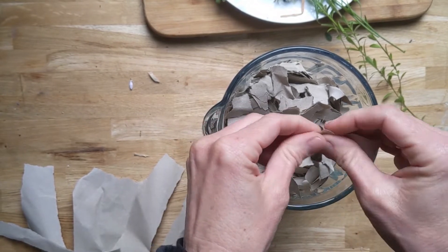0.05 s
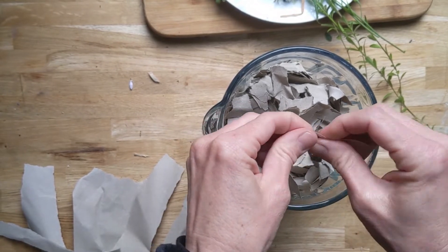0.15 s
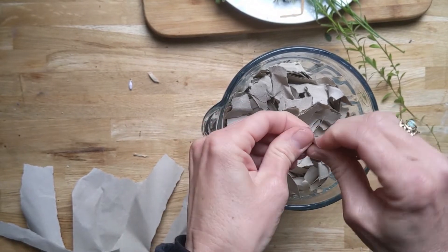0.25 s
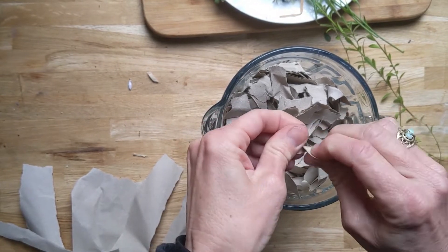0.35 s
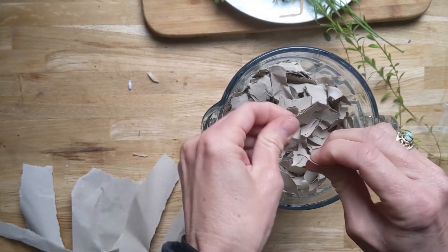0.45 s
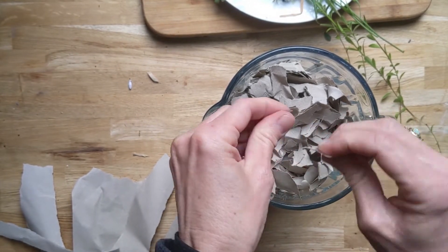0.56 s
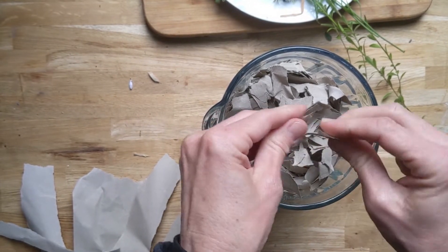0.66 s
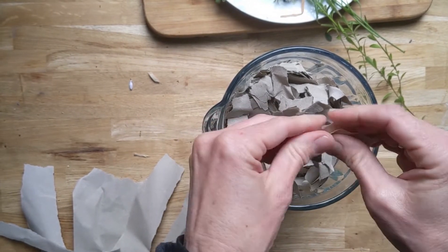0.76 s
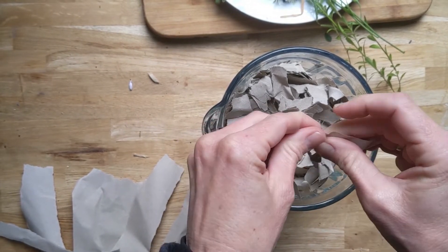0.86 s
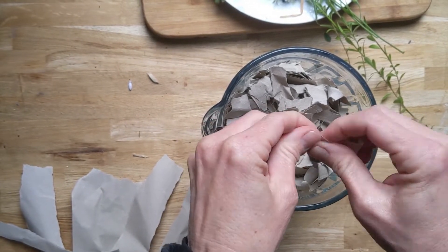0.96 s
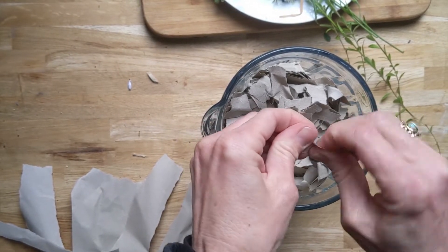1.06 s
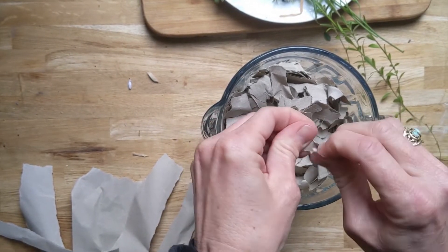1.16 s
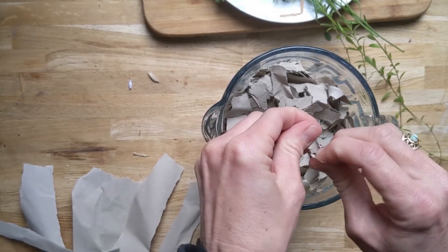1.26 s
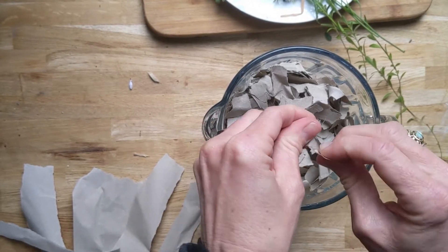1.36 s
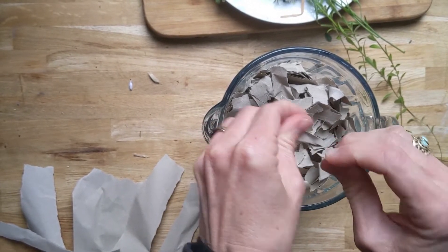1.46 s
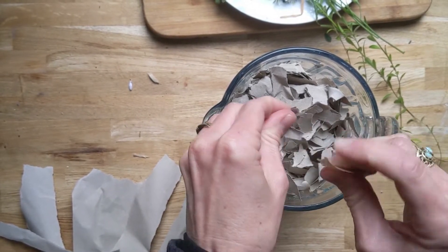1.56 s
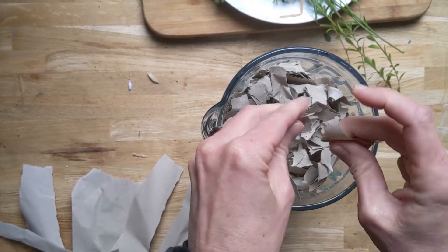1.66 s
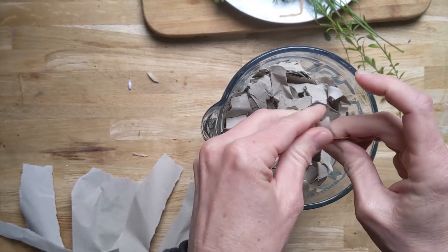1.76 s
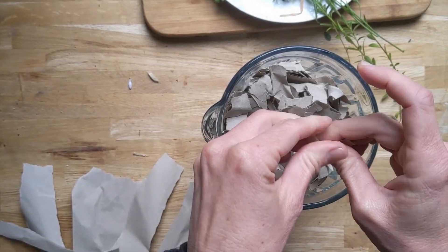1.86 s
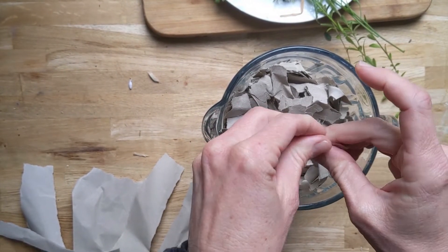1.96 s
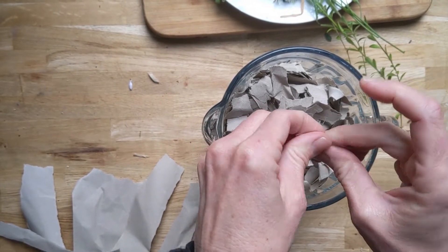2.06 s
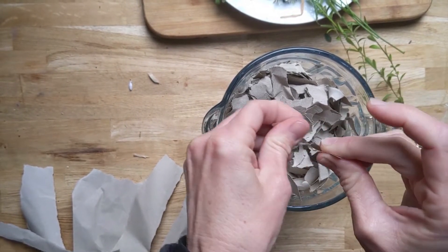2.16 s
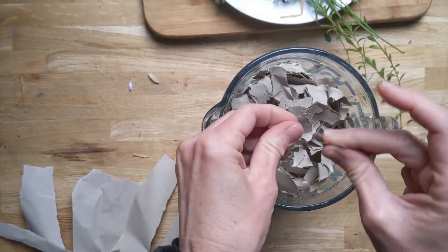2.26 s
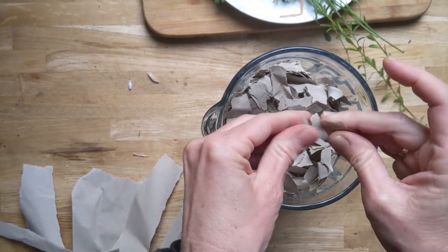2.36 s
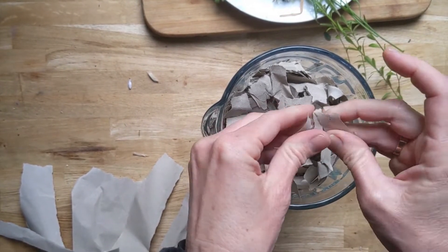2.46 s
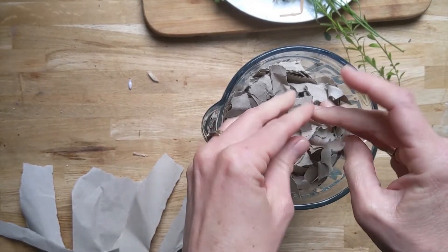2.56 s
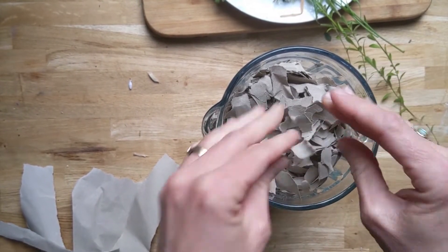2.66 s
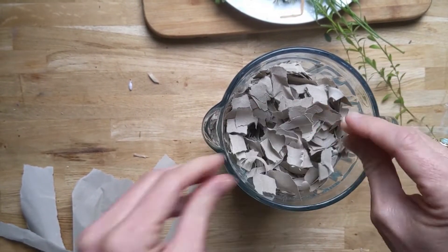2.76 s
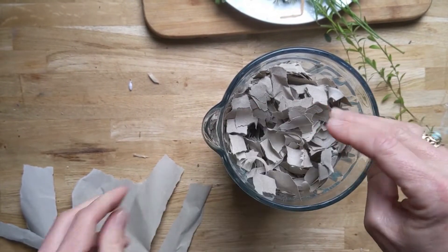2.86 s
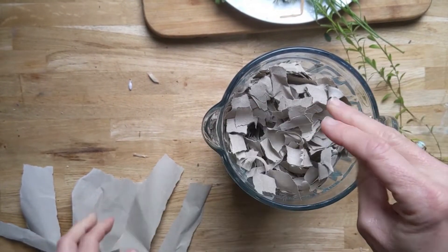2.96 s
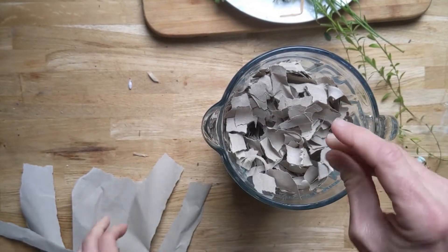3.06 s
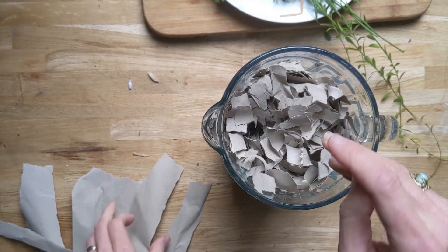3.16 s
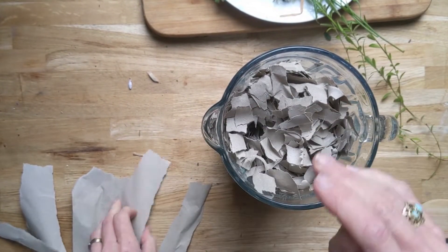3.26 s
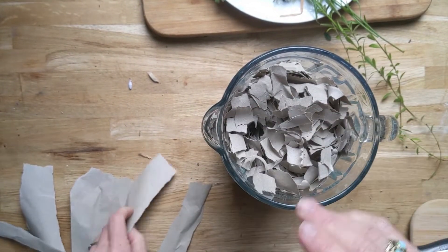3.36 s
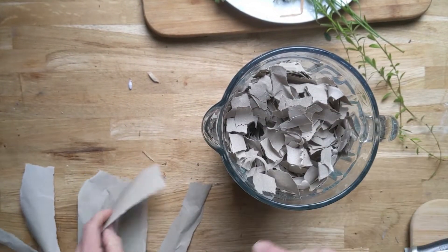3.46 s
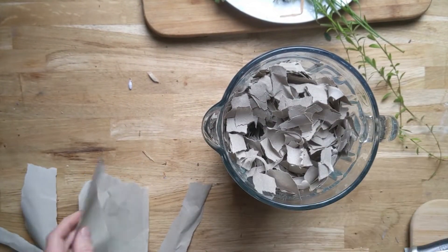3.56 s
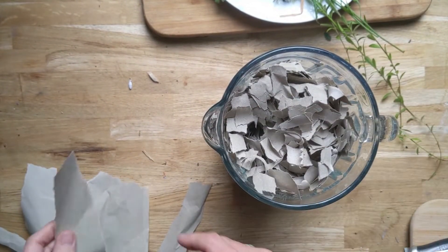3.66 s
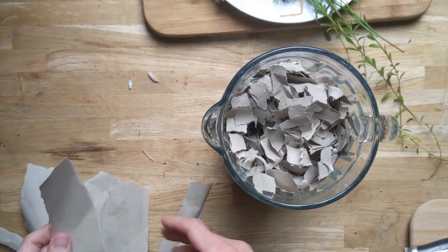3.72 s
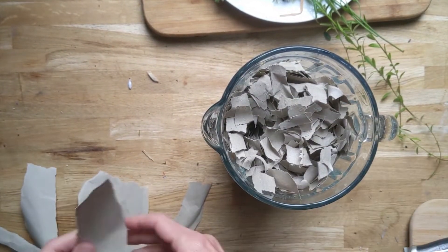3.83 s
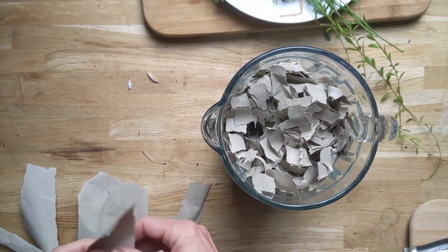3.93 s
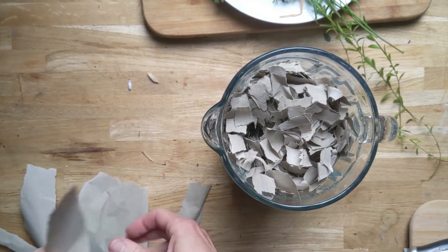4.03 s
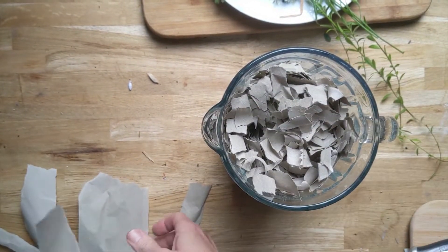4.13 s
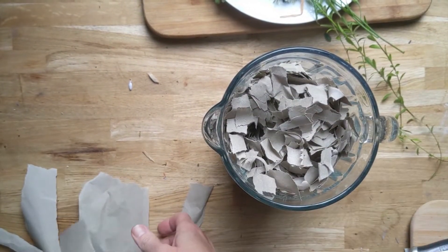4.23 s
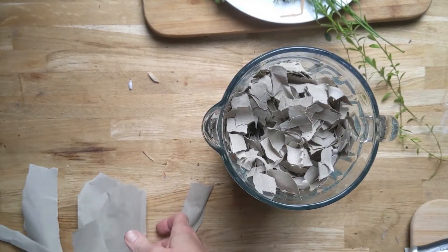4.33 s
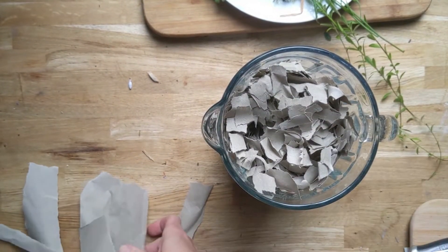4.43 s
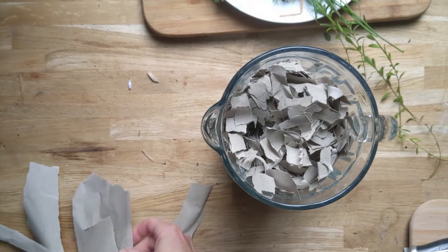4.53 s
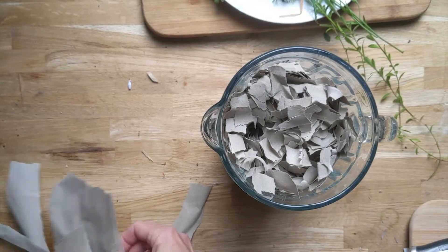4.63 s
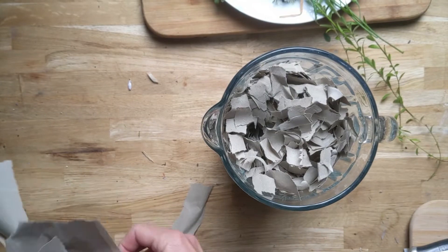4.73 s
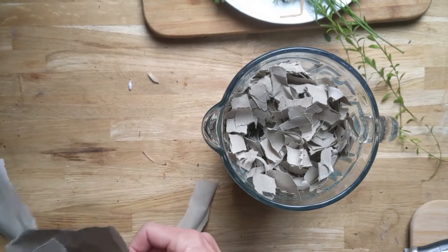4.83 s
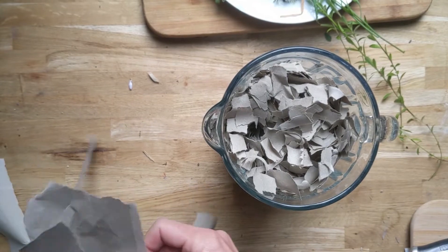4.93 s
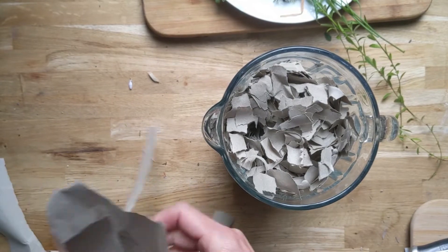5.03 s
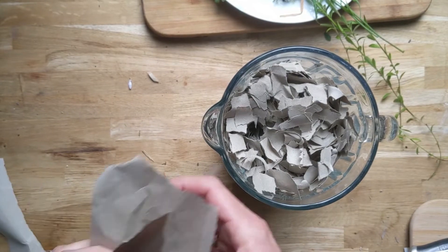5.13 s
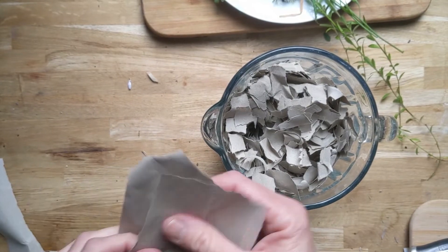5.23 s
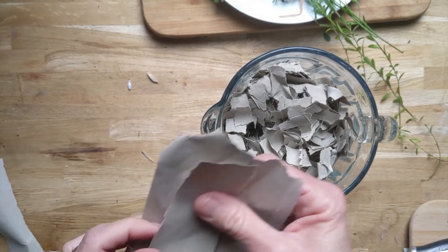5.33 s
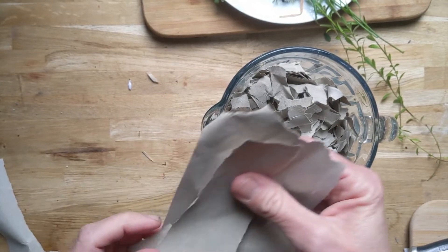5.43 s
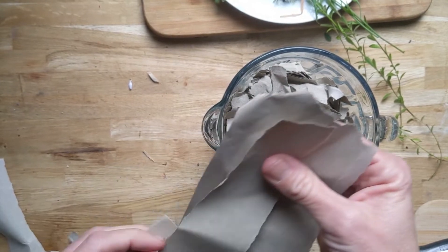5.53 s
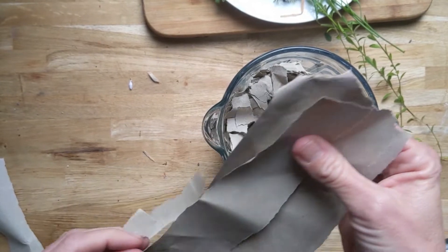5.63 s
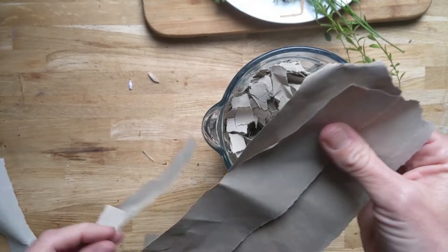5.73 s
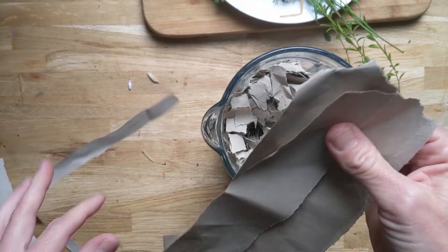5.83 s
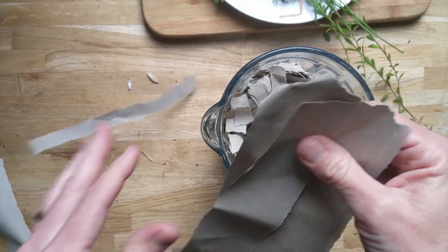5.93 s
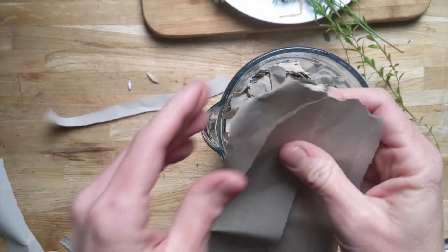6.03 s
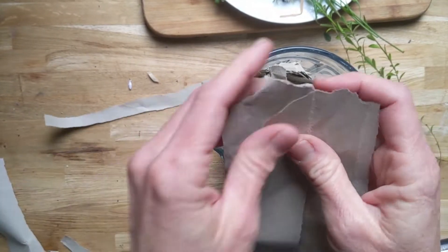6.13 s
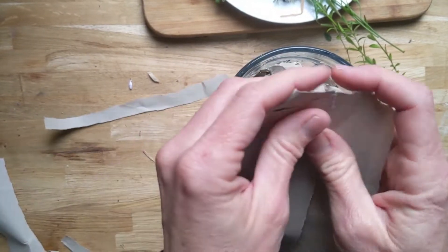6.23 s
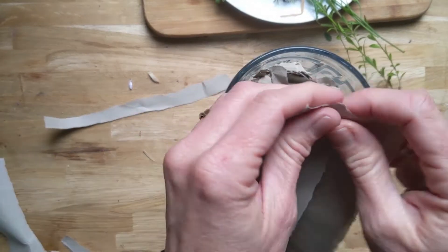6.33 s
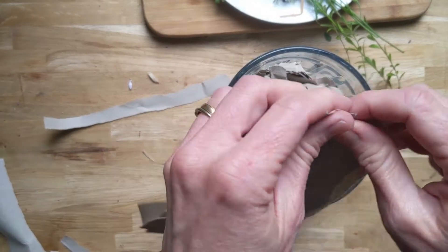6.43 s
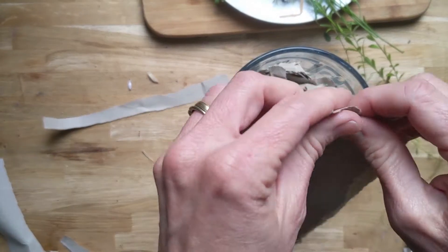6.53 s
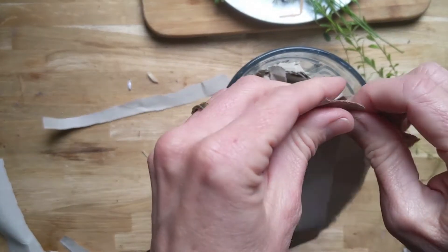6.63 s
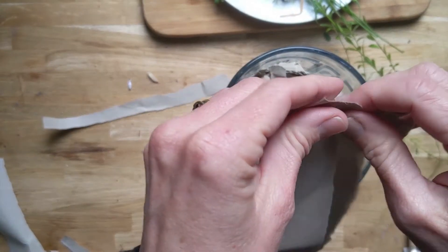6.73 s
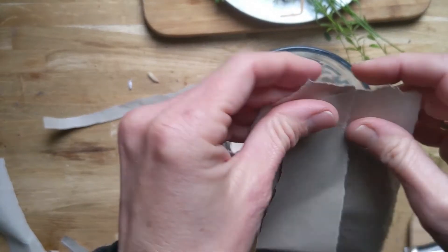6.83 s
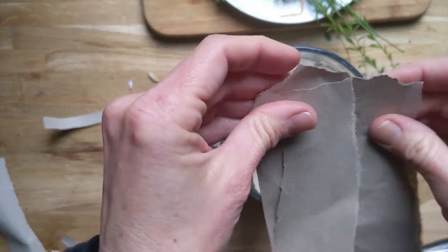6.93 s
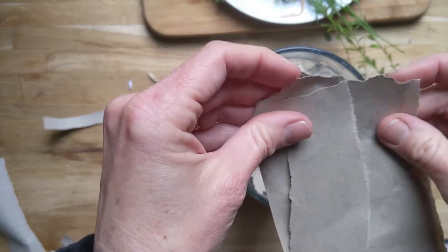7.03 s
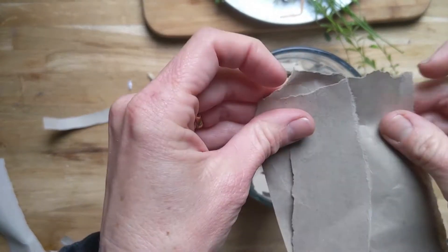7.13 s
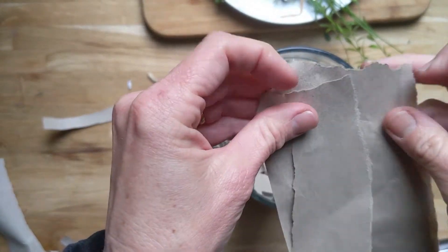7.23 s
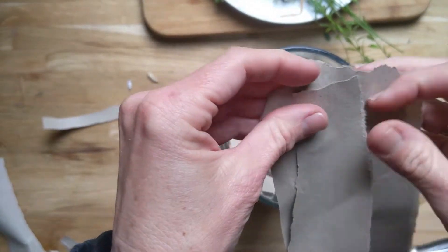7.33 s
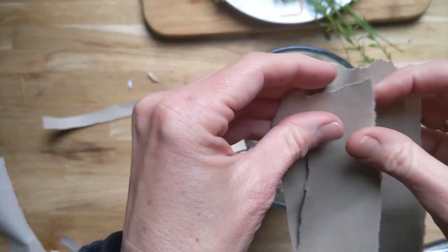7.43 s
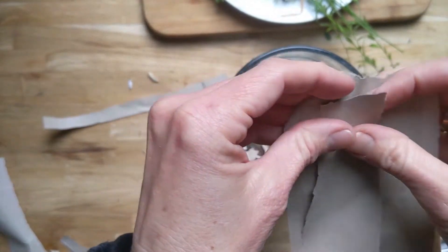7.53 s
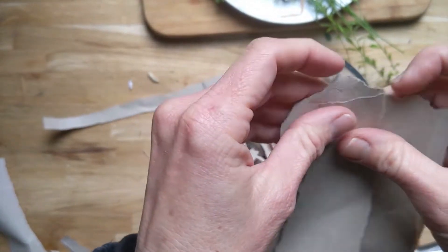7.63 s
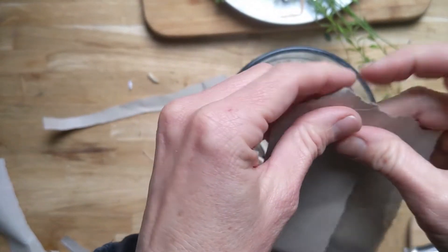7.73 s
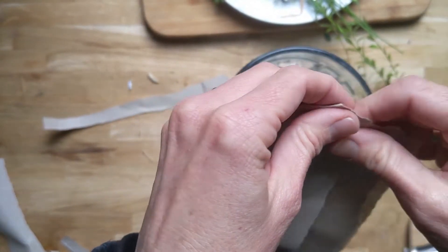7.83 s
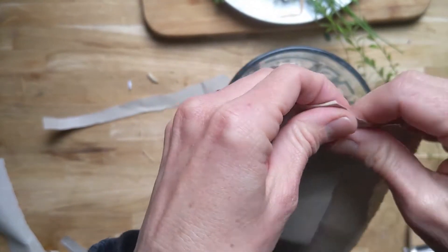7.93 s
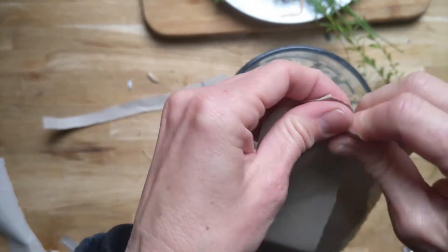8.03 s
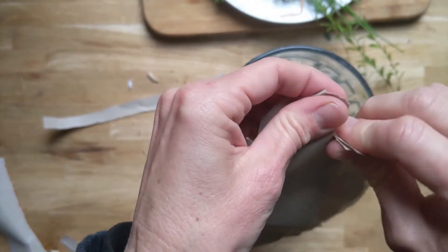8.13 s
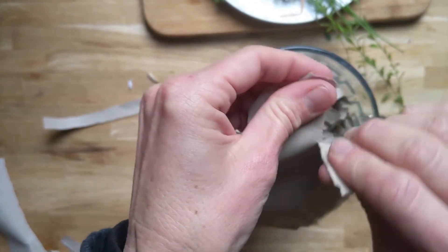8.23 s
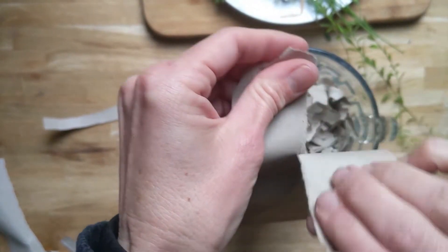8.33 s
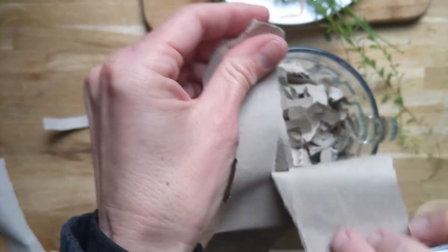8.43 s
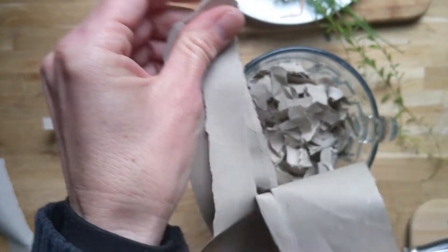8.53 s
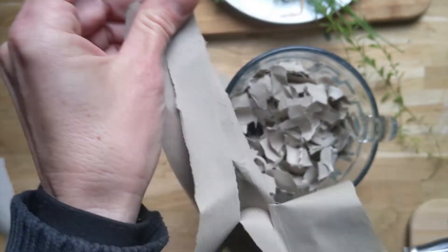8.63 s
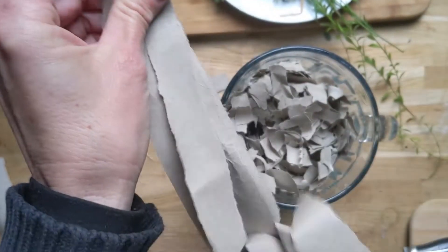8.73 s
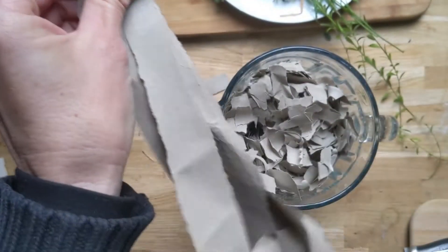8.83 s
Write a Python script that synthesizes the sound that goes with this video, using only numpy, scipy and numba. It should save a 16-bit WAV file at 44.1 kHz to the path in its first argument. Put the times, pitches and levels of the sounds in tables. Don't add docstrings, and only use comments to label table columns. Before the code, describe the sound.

Hands tear small paper scraps with tiny crisp rips, then drag, flap and crumple larger sheets, ending in a loud long tear in a quiet room.

```python
import sys
import numpy as np
from scipy import signal
from scipy.fft import rfft, irfft
from scipy.io import wavfile
from scipy.ndimage import uniform_filter1d
from numba import njit

SR = 44100
rng = np.random.default_rng(int(sys.argv[2]) if len(sys.argv) > 2 else 0)


def put_to_file(sound):
    columns = np.atleast_2d(sound).T
    safe = np.clip(columns, -1, 1)
    whole_steps = np.round(safe * 32767)
    wavfile.write(sys.argv[1], SR, whole_steps.astype(np.int16))


def invert_db(x):
    u = np.asarray(x, float) / 20
    return 10 ** u


N = 391608
SCRAPS_END_S = 3.4

# (f/Hz, left-right correlation)
LIKENESS = [(60, 0.97), (300, 1), (700, 0.36), (1400, 0.44), (3100, 0.38), (6500, 0.0069)]
# (t/s, pull as level/dB, flap re level/dB, edge brightness/dB)
TEAR = [(8.14, -63, -25, 13.5), (8.223, -38.5, -12, 4.5), (8.294, -33.5, -16.5, -1.5),
        (8.336, -38, -4.5, 4.5), (8.39, -33, -17, 6), (8.422, -28, -26, 2.5), (8.45, -29.5, -11.5, 1),
        (8.492, -29.5, -13.5, 8.5), (8.52, -29, -13.5, 3.5), (8.562, -31.5, -10, 5), (8.598, -27, -17, 1.5),
        (8.625, -24.5, -14.5, -2), (8.66, -28, -15, 1), (8.704, -34, -5, 3.5), (8.764, -26.5, -14.5, -1),
        (8.785, -27.5, -11, -1), (8.84, -28.5, -12, 1.5), (8.88, -29, -17, 2)]


def on_log(table, hz):
    f, v = np.transpose(table)
    return np.interp(np.log(hz), np.log(f), v)


def unit(x):
    return x / np.sqrt(np.mean(x ** 2) + 1e-30)


@njit
def svf(x, hz, width):
    y, b, l = np.empty(len(x)), 0., 0.
    g, k = np.tan(np.pi * hz / SR), width / hz
    for i in range(len(x)):
        v = (b + g * (x[i] - l)) / (1 + g * (g + k))
        b, l, y[i] = 2 * v - b, l + 2 * g * v, k * v
    return y


def band(x, hz, width):
    hz, width = float(hz), float(width)
    return np.array([svf(svf(c + 1e-18, hz, width), hz, width) for c in x])


def pair(size, like):
    mid, side = rng.standard_normal((2, size))
    like = np.clip(like, 0, .99)
    return np.sqrt((1 + like) / 2) * mid + np.sqrt((1 - like) / 2) * side * np.array([[1], [-1]])


def walk(rate):
    k = int(SR / rate)
    held = np.repeat(rng.standard_normal(N // 50)[:N // k + 1], k)
    return unit(uniform_filter1d(uniform_filter1d(held, k), k)[:N])


@njit
def grains(starts, poles, sizes, size):
    out = np.zeros((2, size))
    for k in range(len(starts)):
        z = 1. + 0j
        for i in range(starts[k], size):
            z *= poles[k]
            out[0, i] += sizes[k, 0] * z.imag
            out[1, i] += sizes[k, 1] * z.imag
            if z.real ** 2 + z.imag ** 2 < 1e-5:
                break
    return out


def room_tone(t):
    # (f/Hz, level per Hz/dB)
    air_colour = [(20, -10), (45, -7), (80, -11), (124, -8), (212, -17.5), (340, -15), (500, -18),
                  (1000, -25), (2500, -30), (7300, -39.5), (11000, -29), (15000, -32.5)]
    # (f/Hz, left-right correlation)
    air_likeness = [(60, 0.86), (130, 0.84), (290, 0.69), (640, 0.047), (1400, 0.0065)]
    # (f/Hz, rms level/dB)
    hums = [(24.2, -85), (45.45, -66), (56.8, -70.5), (113.6, -71.5), (134.8, -77), (170.4, -82),
            (336, -80.5), (342, -76.5)]
    hz = np.fft.rfftfreq(N, 1 / SR) + 1
    mid, side = rfft(rng.standard_normal((2, N)))
    like = on_log(air_likeness, hz)
    both = np.sqrt(1 + like) * mid + np.sqrt(1 - like) * side * np.array([[1], [-1]])
    air = invert_db(-64) * unit(irfft(both * invert_db(on_log(air_colour, hz)), N))
    return air + sum(invert_db(db + 1.5) * np.sin(2 * np.pi * (f * t + rng.random())) for f, db in hums)


def squeak(t):
    # start t/s, end t/s, f/Hz, level/dB
    skid = (2.662, 2.698, 2690, -78)
    start, end, hz, db = skid
    phase = 2 * np.pi * hz * np.cumsum(1 + 0.0034 * walk(rate=300)) / SR
    stack = 1.2 * np.sin(phase) + np.sin(2 * phase) + 1.1 * np.sin(3 * phase)
    return invert_db(db) * stack * np.clip(np.minimum(t - start, end - t) / .005, 0, 1)


def bumps():
    # (t/s, peak level/dB, f/Hz)
    pushes = [(4.237, -47, 300), (4.25, -59, 606), (4.378, -59, 580), (5.28, -42, 330), (5.464, -40, 205),
              (6.289, -56, 575), (6.857, -55, 168), (7.079, -49, 243), (7.189, -42.5, 275),
              (7.285, -43.5, 177), (7.376, -40, 191), (7.41, -49, 175), (7.655, -56, 150)]
    out, t = np.zeros((2, N + SR)), np.arange(SR // 8) / SR
    for s, peak_db, hz in pushes:
        width = hz if hz < 400 else 0.2 * hz
        push = band(pair(len(t), 0.99) * np.exp(-t / 0.008), hz, width)
        at = int(s * SR)
        out[:, at:at + len(t)] += invert_db(peak_db + 2) * push / np.abs(push).max()
    return out[:, :N]


def snaps():
    # (t/s, peak level/dB, ring f/Hz, tick level re peak/dB, ring level re crack/dB)
    lift_creases = [(3.293, -37, 2790, -38, 7), (3.356, -37, 2250, -30, -4), (3.563, -39.5, 970, -27, -2),
                    (3.911, -45, 790, -25, -10), (4.02, -19, 1630, -42, -5.5), (4.0201, -35, 775, -40, -1),
                    (4.067, -31, 1700, -31, -5), (4.0809, -20.5, 2530, -21, -23),
                    (4.202, -34.5, 1530, -25, -13), (4.207, -37, 625, -26, -12), (4.344, -40, 2230, -22, 1),
                    (4.759, -33.5, 1240, -30, -6), (4.884, -27.5, 705, -57, -9),
                    (4.8835, -21, 2780, -28, -9), (4.938, -46, 360, -24, -10), (4.995, -44, 5200, -24, 0),
                    (5.036, -36, 2200, -25, 4), (5.103, -44, 1250, -25, -12), (5.196, -51, 580, -25, 0),
                    (5.457, -44, 620, -30, 9), (5.259, -26, 2020, -37, -25), (5.2726, -16, 3060, -21, -13),
                    (5.388, -30, 970, -38, -0.5), (5.464, -23, 794, -39, 2), (5.4646, -17, 3330, -35, -6),
                    (5.263, -28, 3250, -30, -6)]
    fold_creases = [(5.969, -51, 1230, -27, -2), (6.006, -44.5, 313, -15.5, -3.5),
                    (6.251, -34, 3400, -30.5, -18), (6.294, -38.5, 740, -22, -2),
                    (6.468, -45, 1230, -15, -1), (6.53, -26.5, 1226, -20, -5), (6.603, -39, 890, -16, -10),
                    (6.758, -54, 3000, -20, -4), (6.85, -14.5, 3000, -7, -2), (6.8505, -31, 755, -30, 0),
                    (6.851, -31.5, 1150, -30, -1), (6.898, -26.5, 2460, -29, -1),
                    (6.958, -61, 1210, -33, -11), (6.979, -46, 5530, 7, -6), (7.018, -46, 1770, -30, 5),
                    (7.037, -49, 1770, -12, 6), (7.105, -30, 2550, -25, -1),
                    (7.108, -27.5, 1240, -38.5, 2.5), (7.258, -38, 2430, -16, -9),
                    (7.286, -29.5, 2570, -42, -2), (7.374, -22.5, 1880, -42, -31),
                    (7.556, -41, 1230, -19, 1), (7.584, -23, 1230, -49, -2.5), (7.63, -37.5, 1820, -30, -9),
                    (7.65, -39.5, 750, -30, -10), (7.71, -51, 1250, -30, 6), (7.8106, -31, 1164, -40, 6),
                    (7.9288, -18, 2870, -35, -6), (7.9288, -23, 1220, -40, -6)]
    tear_layers = [
        (8.178, -39, 1330, -5, 13),
        (8.197, -38, 1260, -3, -3),
        (8.412, -18.5, 1820, -20, -4),
        (8.496, -18, 3800, -20, 9),
        (8.517, -15, 3810, -26, 4),
        (8.618, -23, 2440, -25, -10),
        (8.77, -14, 2890, -29, -5),
    ]
    # free, pinched, tearing sheet [ms]
    tail_times_ms = (56, 59, 79)
    # (ratio to ring f, level/dB)
    panel_overtones = [(2.15, -3), (4.2, -6)]
    out, t = np.zeros((2, N + SR)), np.arange(SR // 16) / SR
    kick = 5 * (t == 0)
    sheets = zip((lift_creases, fold_creases, tear_layers), tail_times_ms)
    events = [(*row, t60_ms / 1000) for rows, t60_ms in sheets for row in rows]
    for s, peak_db, hz, tick_db, ring_db, t60 in events:
        lags = np.append(0, rng.random(3)) * 0.0035
        crack = sum(invert_db(-4500 * lag) * (t >= lag) * np.exp(-np.abs(t - lag) / 0.00048) for lag in lags)
        decay = np.exp(-np.log(1000) * t / t60)

        body_hz = np.sqrt(hz * 1800)
        body = unit(band(pair(len(t), .65) * (crack + .45 * decay) + kick, body_hz, 1.7 * body_hz))
        struck = band(pair(len(t), on_log(LIKENESS, hz)) * crack + kick, hz, hz)
        ring = unit(np.array([svf(c, float(hz), hz / 9) for c in struck]))
        for ratio, db in panel_overtones:
            overtone = band(pair(len(t), 0.1) * crack, min(ratio * hz, 6000), 25 / t60)
            body = body + 0.2 * invert_db(db) * unit(overtone)
        thump = band(pair(len(t), .9) * np.exp(-t / .007), 340, 600)
        tick = band(pair(len(t), 0) * (crack + 0.035 * decay), 11800, 17000)

        thump_db = -42 - 0.51 * peak_db
        sound = body + invert_db(ring_db) * ring
        sound = sound / np.abs(sound).max()
        sound = sound + invert_db(thump_db + 8) * thump / np.abs(thump).max()
        sound = sound + invert_db(tick_db + 10) * tick / np.abs(tick).max()
        at = int((s + .001) * SR)
        out[:, at:at + len(t)] += invert_db(peak_db) * sound
    return out[:, :N]


def spikes():
    # (t/s, peak level/dB, f/Hz)
    scrap_fibres = [(0.2976, -31, 10900), (0.3534, -32, 10400), (0.3625, -29, 10500), (0.3846, -35, 14200),
                    (0.4263, -38, 12100), (0.4282, -40, 12200), (0.4329, -32, 12300), (0.4372, -26, 12100),
                    (0.4396, -30, 11900), (0.4423, -34, 12500), (0.448, -19, 12000), (0.448, -23, 12100),
                    (0.4511, -32, 14500), (0.4545, -36, 12000), (0.7445, -27.5, 10000),
                    (1.0242, -24, 12000), (1.0256, -37, 10200), (1.0363, -35, 13800), (1.0389, -24, 14500),
                    (1.0422, -35, 14500), (1.0509, -25.5, 13600), (1.1678, -24, 13400), (1.169, -24, 11900),
                    (1.173, -18, 14400), (1.1754, -18, 13400), (1.1775, -13, 12670), (1.1794, -20, 12200),
                    (1.183, -14.5, 13600), (1.1844, -33, 12000), (1.1868, -30, 14500), (1.1889, -32, 13800),
                    (1.1916, -35, 13700), (1.4324, -31, 13300), (1.4366, -38, 11600), (1.4391, -29, 12100),
                    (1.4407, -25, 12000), (1.4435, -24, 13300), (1.4458, -32, 13900), (1.4514, -24, 11700),
                    (1.4548, -13, 13900), (1.4552, -25, 14300), (1.4573, -13, 11800), (1.46, -22, 10900),
                    (2.1196, -32, 15400), (2.1215, -28, 12900)]
    # (t/s, peak level/dB, f/Hz)
    tear_fibres = [(8.4135, -18, 12800), (8.4178, -11, 4100), (8.4519, -12, 14400), (8.4621, -13, 3300),
                   (8.4644, -5.5, 2500), (8.4704, -17, 14900), (8.4862, -18, 3700), (8.4925, -14, 10800),
                   (8.4949, -14, 10000), (8.499, -16, 10400), (8.5015, -15, 12100), (8.5044, -11, 3600),
                   (8.509, -9, 10300), (8.517, -7, 3800), (8.5337, -14, 3700), (8.5883, -14, 5400),
                   (8.6012, -11, 3400), (8.6181, -17, 3400), (8.6204, -16, 11800), (8.6395, -12, 2900),
                   (8.6623, -14, 12700), (8.6676, -17, 11400), (8.7713, -12, 4720), (8.773, -3.5, 3130),
                   (8.778, -9, 2800), (8.7817, -12, 3100), (8.791, -20, 3600), (8.8072, -13, 12600),
                   (8.8397, -14, 11300), (8.848, -6, 5800)]
    s, db, hz = np.transpose([*scrap_fibres, *tear_fibres])
    poles = np.exp((2j * np.pi * hz - 1 / .0002) / SR)
    side = .6 * (2 * rng.random((len(s), 1)) - 1)
    sizes = invert_db(db - 2)[:, None] * (1 + side * [1, -1])
    pops = grains((s * SR).astype(np.int64), poles, sizes, size=N)
    return signal.sosfilt(signal.butter(3, 2000, "high", fs=SR, output="sos"), pops)


def breaks(rate, length_s, spread):
    when, chance = rng.random((int(rate * N / SR), 2)).T
    size = 1 + spread * (np.minimum(-np.log(1 - chance), 2.8) - 1)
    fade = np.exp(-1 / (length_s * SR))
    return signal.lfilter([1], [1, -fade], np.bincount((when * N).astype(int), size, N))


def paper(levels_db, grit_db, rate, spread, bed, flicker_db, size, count):
    # flap, body, fibre [Hz]
    motion_hz = (600, 3000, 11000)
    # (f/Hz, level per third octave/dB)
    sheet_colour = [(75, -27), (150, -18), (300, -14.5), (700, -16), (1200, -12), (2400, -7.5),
                    (3600, -6.5), (5500, -7), (7400, -16), (9700, -5), (12500, -2), (15000, -5.5)]
    # (t/s, change in crispness/dB)
    crispness = [(4.1, 1.5), (4.5, -3.5), (5.0, 3.5), (5.5, 1.5), (6.0, 0.5)]
    out, shared, patch = 0, breaks(rate, 0.000068, spread), walk(rate=13)
    place = np.log(motion_hz)
    crisp_db = np.interp(np.arange(N) / SR, *np.transpose(crispness))
    for hz in 15000 / 2 ** (np.arange(count) / 3):
        weights = [np.interp(np.log(hz), place, row) for row in np.eye(3)]
        patch = 0.61 * patch + 1.17 * walk(rate=60)
        db = np.dot(weights, levels_db) + on_log(sheet_colour, hz) + flicker_db * patch
        db = db + crisp_db * np.exp(-2 * np.log2(hz / 4730) ** 2)
        own = breaks(rate, 2.2 / hz, spread)
        gate = bed + invert_db(grit_db * (0.45 * shared + 0.4 * own)) - 1
        gate = gate / np.sqrt(np.abs(uniform_filter1d(gate ** 2, size=size)))
        hiss = pair(N, on_log(LIKENESS, hz))
        out = out + invert_db(db) * band(gate * hiss, hz, hz * .45) * np.sqrt(SR / (hz * .8))
    return out


def rips(t):
    # (t/s, level/dB, edge brightness/dB)
    quick = [(0.07, -61, 12.5), (0.115, -62, 13), (0.258, -44, 1), (0.292, -60, 22.5), (0.351, -72, 30),
             (0.381, -67, 5), (0.445, -41, 7), (0.742, -46, -3), (0.9, -45, -30), (0.932, -66, -5),
             (1.022, -48, -1), (1.036, -48.5, 11), (1.1, -54.5, 11), (1.314, -72.5, 19),
             (1.452, -39.5, 5.5), (2.006, -53, -15), (2.023, -49, -10), (2.118, -48, 9.5),
             (2.151, -62.5, 22.5), (2.7, -61.5, 2), (3.576, -57, 16), (4.422, -37.5, 14.5), (4.445, -40, 9),
             (5.904, -66.5, 18), (2.35, -68, 7), (8.109, -55, 13), (8.124, -56.5, 17), (1.008, -70, 16),
             (1.144, -74, 17), (1.239, -69, 17.5), (1.42, -66, 17), (2.45, -67, 0), (3.015, -80, 17),
             (.218, -62.5, 2.5), (.66, -70, 9)]
    # (t/s, level/dB, edge brightness/dB, rise/ms)
    slow = [
        (0.424, -66.5, 35, 20),
        (1.166, -52.5, 19, 15),
        (1.432, -53, 18, 8.8),
        (8.04, -39, 4.5, 3.2),
    ]
    quick_rise_ms, fall_ms, flap_db = 0.42, 5.4, -30
    power = np.full((3, N), 1e-14)
    for s, db, edge_db, rise_ms in [(*row, quick_rise_ms) for row in quick] + [*slow]:
        a, b = int(s * SR), int((s + .15) * SR)
        ms = 1000 * (t[a:b] - s)
        fall = np.exp(-2 * (ms - rise_ms) / fall_ms)
        swell = np.where(ms < rise_ms, 0.035 + 0.58 * ms / rise_ms, fall)
        power[:, a:b] += np.outer(invert_db(2 * (db + np.array([flap_db, 0, edge_db]))), swell)
    levels = 10 * np.log10(power)
    return paper(levels, 17, rate=800, spread=.25, bed=.9, flicker_db=1.5, size=256, count=14)


def crumple(body_db, count=6000):
    when, pitch, ring, size, side = rng.random((count, 5)).T
    starts = (when * N).astype(np.int64)
    hz = 450 * 17 ** pitch
    ring_s = .0005 + .004 * ring ** 3
    poles = np.exp((2j * np.pi * hz - 1 / ring_s) / SR)
    rare_db = -4.5 * np.log(np.maximum(size, .12))
    db = body_db[starts] + rare_db - 6 * np.abs(np.log2(hz / 2600)) - 6
    spread = (2 * side - 1) * np.sqrt(1 - on_log(LIKENESS, hz))
    return grains(starts, poles, invert_db(db)[:, None] * np.transpose([1 + spread, 1 - spread]), size=N)


def strokes(t):
    # (fullest t/s, swell/s, fade/s, level/dB, edge brightness/dB)
    fingers = [(.07, 0.21, 0.17, -69.5, 9), (.27, 0.0099, 0.082, -62.5, 9),
               (.38, 0.088, 0.041, -67.5, 21.5), (.445, 0.054, 0.057, -61.5, 5),
               (.6, 0.091, 0.064, -68, 14.5), (0.742, 0.056, 0.3, -69.5, 10), (.88, 0.042, 0.13, -72, 17),
               (0.939, 0.019, 0.019, -54.5, 0.5), (.96, .012, .025, -62.5, 10),
               (1.036, 0.018, 0.097, -62, 11.5), (1.19, 0.048, 0.072, -76.5, 17),
               (1.33, 0.016, 0.1, -79, 23), (1.447, 0.012, 0.028, -51, 4), (1.64, 0.033, 0.062, -71, 18.5),
               (1.787, .012, 0.022, -80.5, 18), (1.83, .006, 0.11, -75.5, 12),
               (1.903, 0.0067, .013, -62, 8), (1.942, 0.012, .03, -68.5, 10), (1.966, .012, 0.021, -63, 5),
               (2.03, 0.06, .07, -72.5, 10.5), (2.14, 0.023, 0.025, -61, 9), (2.19, .03, 0.027, -76, 6),
               (2.322, 0.016, 0.067, -76.5, 20), (2.56, 0.11, 0.028, -75.5, 6), (2.73, 0.095, 0.16, -80, 8),
               (2.88, 0.072, 0.042, -83, 13), (3.02, 0.027, 0.074, -84, 13)]
    lifts = [(3.29, 0.037, 0.063, -49, 5), (3.4, 0.064, 0.13, -50, 3.5), (3.57, 0.081, 0.081, -59, 0),
             (3.72, 0.16, 0.082, -65, 5), (3.86, 0.036, 0.058, -65.5, 6.5), (3.96, 0.053, 0.12, -52.5, 6.5),
             (4.08, 0.1, 0.16, -56.5, 0), (4.2, 0.078, 0.074, -59, -1), (4.33, 0.057, 0.33, -50, -1),
             (4.45, 0.0082, 0.11, -48, -6), (4.58, 0.068, 0.095, -46, -3.5), (4.75, 0.13, 0.12, -46, -0.5),
             (4.89, 0.035, 0.14, -51.5, -8), (5.03, 0.063, 0.089, -51.5, 5), (5.19, 0.046, 0.096, -60.5, 1),
             (5.27, 0.024, 0.097, -46.5, 1.5), (5.4, 0.04, 0.081, -52.5, 3), (5.49, 0.079, 0.075, -44, 0.5),
             (5.585, 0.07, 0.021, -46, -2.5), (5.61, .02, 0.047, -62, 6)]
    folds = [(5.742, 0.015, 0.076, -66, 5), (5.8, 0.054, 0.093, -62.5, 8), (5.89, 0.044, 0.023, -75, 14),
             (6.0, 0.11, 0.21, -59.5, 2.5), (6.14, 0.11, 0.17, -62.5, 6.5), (6.23, 0.15, 0.092, -55, -6),
             (6.33, 0.12, 0.07, -48.5, 4), (6.5, 0.076, 0.24, -53.5, 2.5), (6.65, 0.062, 0.33, -59, 6),
             (6.79, 0.038, 0.041, -54.5, 0), (6.87, 0.058, 0.2, -49.5, 7), (7.04, 0.045, 0.045, -76, -23),
             (7.119, 0.048, 0.075, -55, 1), (7.25, 0.076, .05, -63.5, -5), (7.3, 0.068, 0.079, -54.5, 0.5),
             (7.42, 0.046, 0.039, -58, -4), (7.52, 0.078, 0.12, -53.5, 3.5), (7.6, 0.065, 0.077, -53, 5),
             (7.75, 0.13, 0.045, -57.5, 7), (7.82, 0.056, 0.068, -59, 8.5), (7.94, 0.074, 0.19, -59, -10.5),
             (8.053, 0.017, 0.035, -49.5, 9.5), (8.13, 0.025, 0.014, -56, 8)]
    # strip, lifted sheet, folded sheet [dB]
    flaps_db = (-5.5, -10.5, -7)
    # flap, body, fibre [dB]
    rest_db = (-92, -79.5, -79.5)
    power = np.outer(invert_db(2 * np.array(rest_db)), invert_db(2 * 6.5 * (t > SCRAPS_END_S)))
    for rows, flap_db in zip((fingers, lifts, folds), flaps_db):
        for s, swell, fade, db, edge_db in rows:
            a, b = max(int((s - .4) * SR), 0), int((s + .6) * SR)
            away = (t[a:b] - s) / np.where(t[a:b] < s, swell, fade)
            shape = invert_db(2 * (db - 12 * away ** 2))
            power[:, a:b] += np.outer(invert_db(2 * np.array([flap_db, 0, edge_db])), shape)
    s, pull_db, flap_db, edge_db = np.transpose(TEAR)
    for k, db in enumerate((pull_db + flap_db, pull_db, pull_db + edge_db)):
        power[k] += invert_db(2 * np.interp(t, s, db, left=-99))
    return 10 * np.log10(power)


def rustle(t):
    slips = np.cumsum(rng.random(N) < 70 / SR)
    grip = uniform_filter1d(rng.standard_normal(N // 50)[slips], size=128)
    tearing = t > TEAR[0][0]
    levels = strokes(t) + grip * np.where(tearing, 0.88, 0.78)
    grit_db = np.where(tearing, 6.6, 6.2)
    flicker_db = np.where(tearing, 0.43, 2)
    panels = crumple(levels[1] - 2 * tearing)
    sheet = paper(levels - 1, grit_db, rate=1200, spread=1, bed=.5, flicker_db=flicker_db, size=2048, count=24)
    return sheet + panels


def jar_hollow(near_jar, t):
    # (f/Hz, width/Hz, level/dB)
    hollow = [(765, 405, -7), (1230, 132, -11.5), (1770, 100, -12.5), (2410, 27, -17), (2870, 70, -34),
              (3360, 80, -25), (4020, 370, -21)]
    # (t/s, level/dB)
    over_opening = [
        (5.3, -1.5),
        (6.3, 1),
        (8.1, 6.5),
        (8.5, 0),
    ]
    driven = near_jar * invert_db(np.interp(t, *np.transpose(over_opening)))
    return sum(invert_db(db + 10) * svf(driven, float(hz), 0.69 * width) for hz, width, db in hollow)


def table_gap(near, t):
    lifted = (t > 2.7) * (t < 5.15)
    return invert_db(5.5) * svf(near.mean(axis=0) * lifted, 577., 23.)


def far_port_delay(near, t):
    # (t/s, lead/samples)
    left_lead = [(2.6, 0), (3.1, 6), (5.0, 6), (5.9, 0), (8.0, 0), (8.3, 2)]
    lead = np.round(np.interp(t, *np.transpose(left_lead))).astype(int)
    return np.array([near[0], near[1][np.arange(N) - lead]])


def room_wash(near, t):
    lag = t[:SR // 2]
    mid, side = rng.standard_normal((2, len(lag)))
    side = signal.sosfilt(signal.butter(2, 700, "high", fs=SR, output="sos"), side)
    decay = np.exp(-np.log(1000) * lag / 0.085)
    walls = (mid + side * np.array([[1], [-1]])) * decay * (lag > .003)
    walls = walls / np.sqrt(np.sum(walls[0] ** 2))
    return invert_db(-11.5) * signal.fftconvolve(near, walls, axes=1)[:, :N]


def scene():
    t = np.arange(N) / SR
    sheet, cracks = rustle(t) + rips(t) + spikes(), snaps()
    pan_db = -1.5 * (t < SCRAPS_END_S) / 2
    near = sheet * invert_db(np.array([pan_db, -pan_db])) + cracks + bumps() + squeak(t)
    near = near + jar_hollow((sheet + invert_db(-6) * cracks).mean(axis=0), t)
    near = near + table_gap(near, t)
    near = far_port_delay(near, t)
    return near + room_wash(near, t) + room_tone(t)


def top_cut(x):
    return signal.sosfilt(signal.butter(12, 17020, fs=SR, output="sos"), x)


def record(dry):
    # (f/Hz, left minus right level/dB)
    port_tilt = [(60, 0), (110, 1), (200, 1), (380, 0.5), (700, 0.5), (1290, 0.5), (2380, 2.5), (4400, 2.5),
                 (8120, -2.5), (15000, -10.5)]
    hz = np.fft.rfftfreq(N, 1 / SR) + 1
    tilt = on_log(port_tilt, hz) / 2
    cut = -.2 * np.maximum(hz - 15800, 0)
    ports = irfft(rfft(dry) * invert_db(np.array([tilt, -tilt]) + cut), N)
    return top_cut(ports)


dry = scene()
out = record(dry)
put_to_file(out)
```